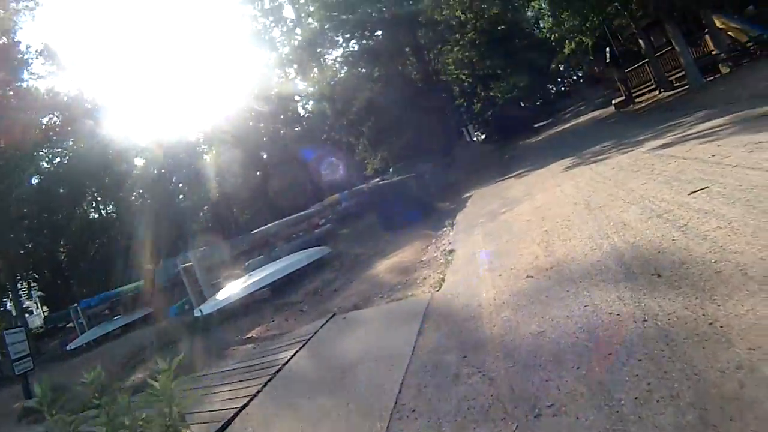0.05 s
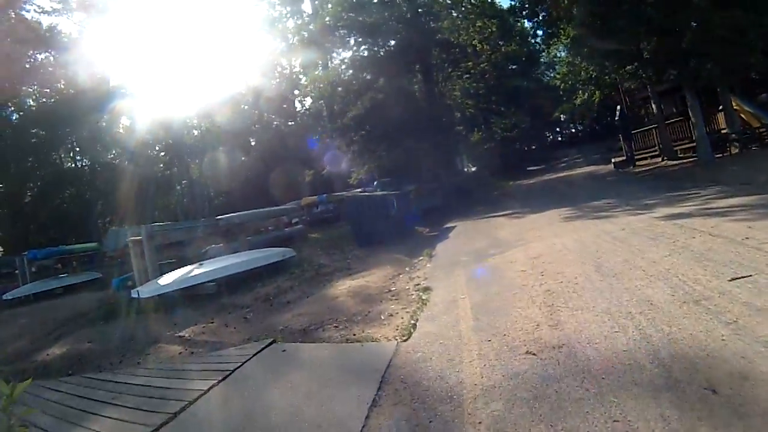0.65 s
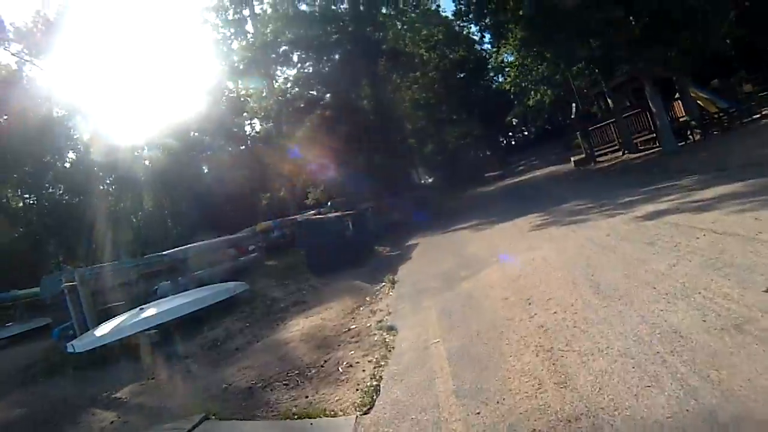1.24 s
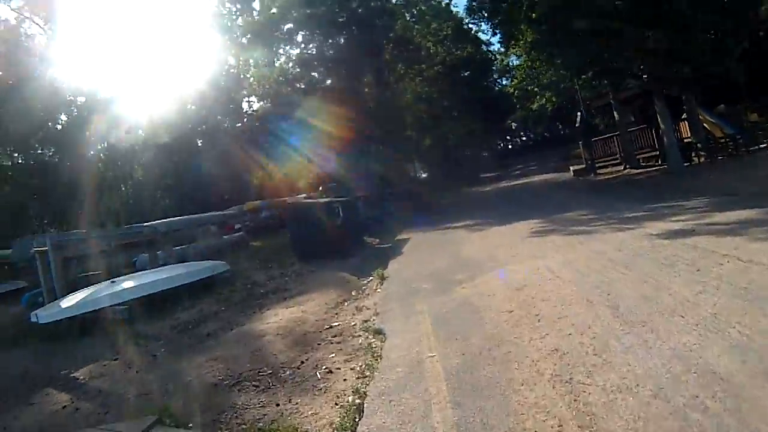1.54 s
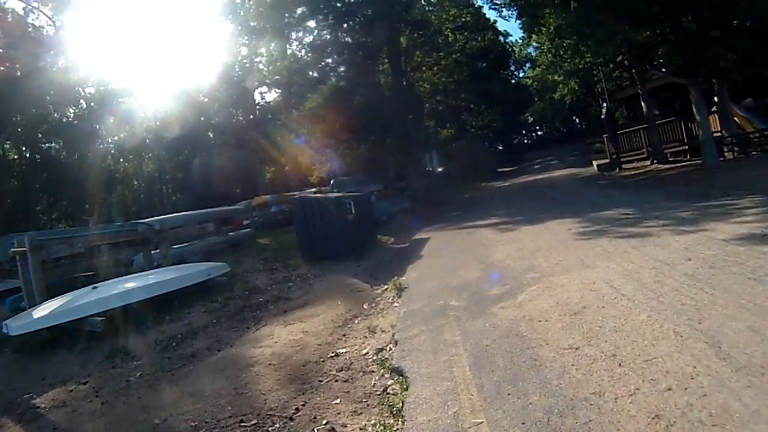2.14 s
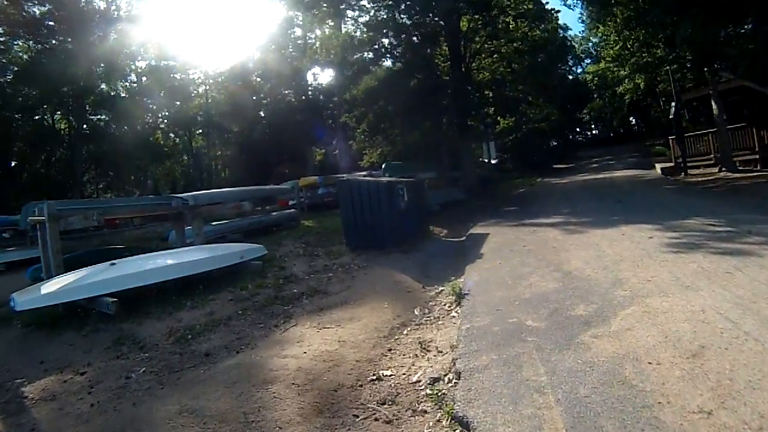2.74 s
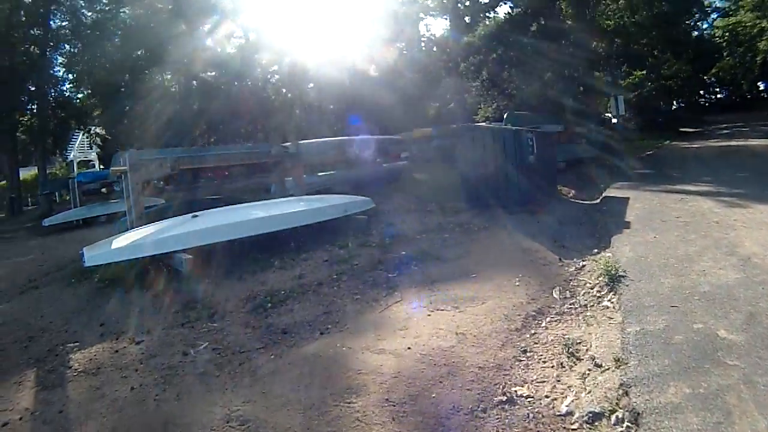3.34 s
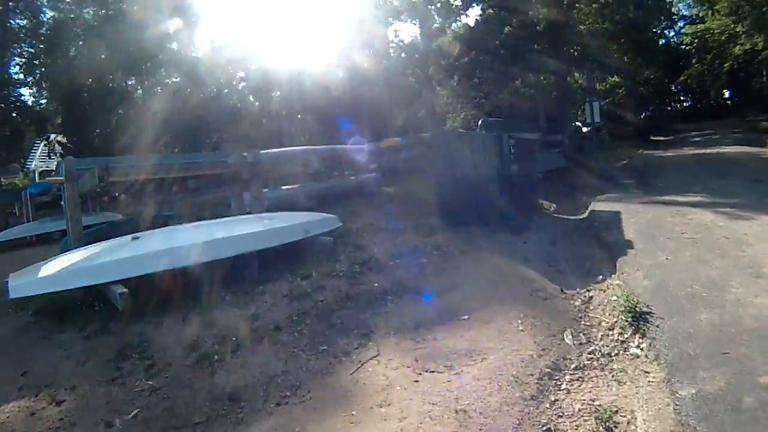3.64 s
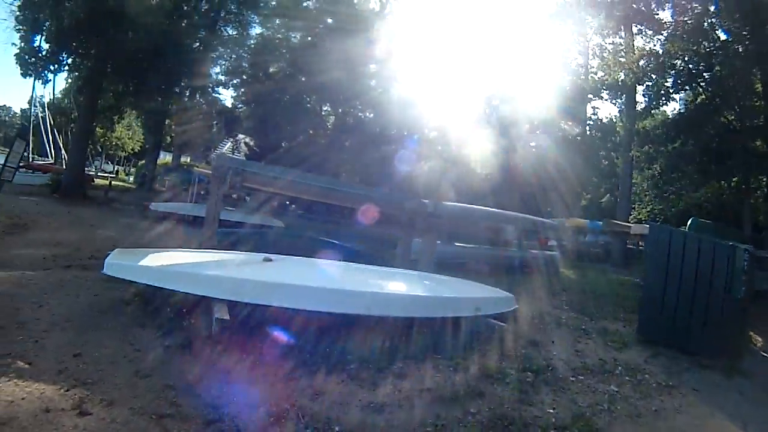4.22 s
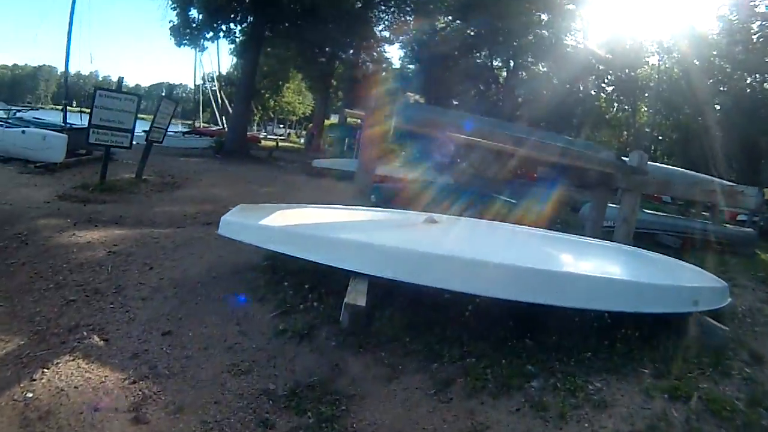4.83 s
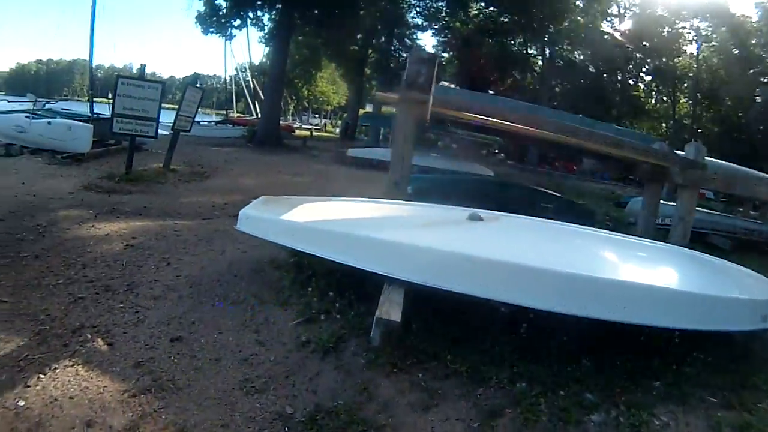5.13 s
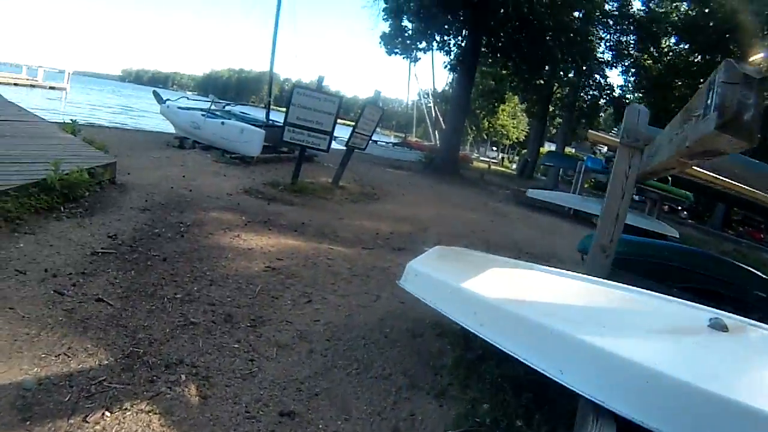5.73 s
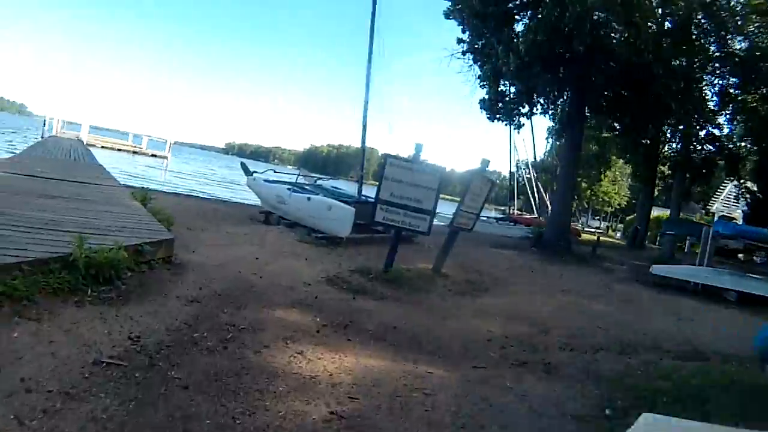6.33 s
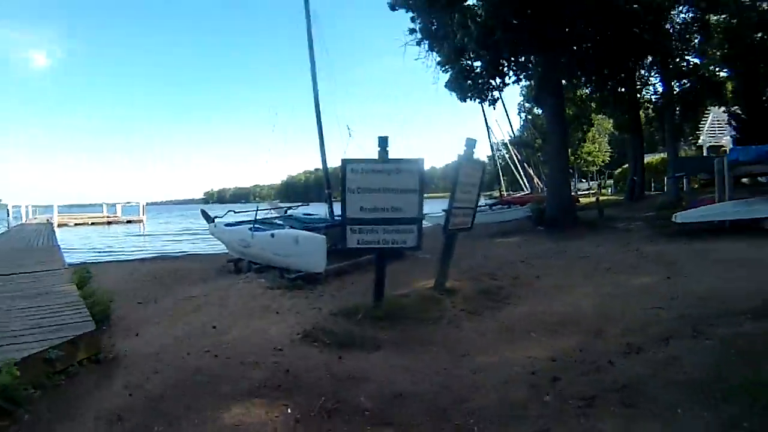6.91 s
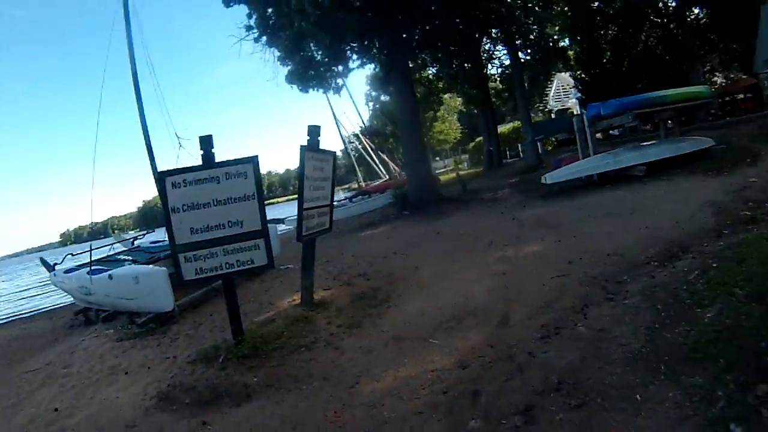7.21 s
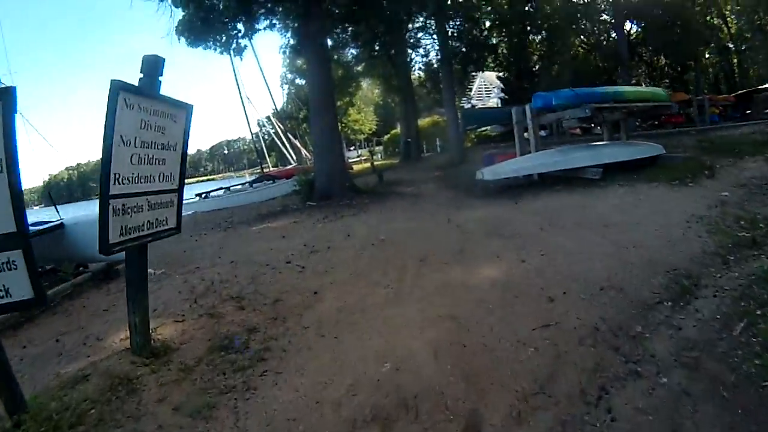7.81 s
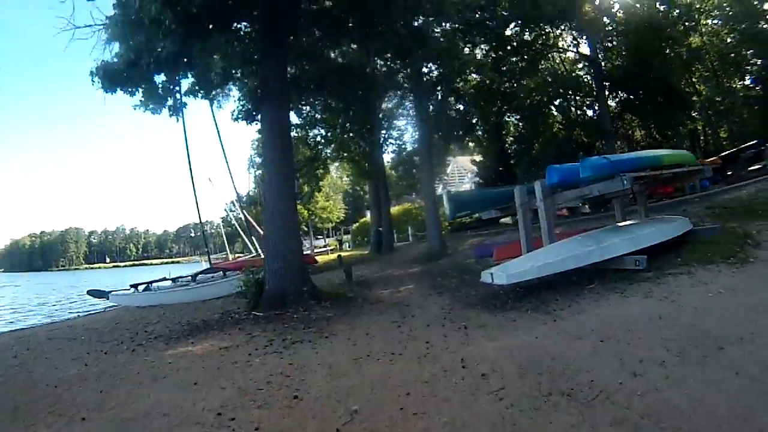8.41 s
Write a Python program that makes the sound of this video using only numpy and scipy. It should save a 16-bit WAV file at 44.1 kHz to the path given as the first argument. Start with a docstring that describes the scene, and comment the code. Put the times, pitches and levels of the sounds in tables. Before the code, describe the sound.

Tyres rumble over dirt and loose sand, picked up almost in mono by a camera mounted on the bicycle, so everything has a boxy ring. Bursts of knocking and rattling come with each rough patch, separated by quieter rolling with gritty chatter and fine hiss. Faint chain chinks, short scuffs and one dry snap dot the ride. The second half adds soft freewheel ticking, brief metallic pings and rasping pebbles before a last run of knocks.

```python
"""A bumpy dirt and sand path, heard through a camera case fixed to a rolling bicycle.
The tyres hum and rumble underneath while grit chatters and sand sizzles. Bumps knock the loose mount;
knocks, scuffs, chatter and the ticking freewheel all ring the same few case resonances.
The chain chinks, something snaps once, pebbles grind, and now and then a small steel part pings."""
import sys
import numpy as np
from scipy import signal
from scipy.fft import rfft, irfft
from scipy.io import wavfile

SR = 44100
rng = np.random.default_rng(int(sys.argv[2]) if len(sys.argv) > 2 else 0)


def dump(signal):
    """Clip the signal to [-1, 1] and save it as 16-bit WAV at the path in sys.argv[1]."""
    limited = np.clip(np.atleast_2d(signal).T, -1, 1)
    pcm = np.round(limited * 32767).astype(np.int16)
    wavfile.write(sys.argv[1], SR, pcm)


N = 373086
TIME = np.arange(N) / SR


def from_db(db):
    """Decibels to gain."""
    return 10 ** (np.asarray(db) / 20)


def rms_one(x):
    """Scale to rms 1."""
    return x / np.sqrt(np.mean(x ** 2) + 1e-20)


def together_db(*gains):
    """Level of unrelated sounds heard at once."""
    return 10 * np.log10(sum(gain ** 2 for gain in gains))


def add(out, s, sound):
    """Mix a sound in from time s on."""
    at = max(int(s * SR), 0)
    out[at:at + len(sound)] += sound[:max(N - at, 0)]


def in_time(rows):
    """Fader curves: each level column at every sample."""
    times, *columns = np.transpose(rows)
    return [np.interp(TIME, times, column) for column in columns]


def swells(rows, attack_s=0.0083, release_s=0.049):
    """Gain envelope: each event rises, holds to the end of its length and dies away."""
    out, t = np.zeros(N), np.arange(SR) / SR
    for s, length, level_db in rows:
        release = np.exp(-np.maximum(t - length, 0) / release_s)
        add(out, s, from_db(level_db) * np.minimum(t / attack_s, 1) * release)
    return out


def drift(per_s):
    """Random modulation of rms 1, gliding through per_s values a second."""
    knots = rng.standard_normal(4000)
    return rms_one(np.interp(TIME * per_s, np.arange(len(knots)), knots))


def noise(spectrum):
    """Noise with the given colour, rms 1."""
    hz, level_db = np.transpose(spectrum)
    bins = np.maximum(np.fft.rfftfreq(N, 1 / SR), 1)
    colour = from_db(np.interp(np.log(bins), np.log(hz), level_db))
    return rms_one(irfft(rfft(rng.standard_normal(N)) * colour, N))


def grains(per_s, spread_db, size):
    """Random tiny contacts, most weak and a few strong."""
    sizes = from_db(spread_db * np.minimum(rng.exponential(1, size), 4)) * rng.choice([-1, 1], size)
    return sizes * (rng.random(size) < per_s / SR)


def slips(per_s, jitter, size):
    """A train of contacts of uneven strength; jitter loosens the rhythm."""
    gaps = np.exp(jitter * rng.standard_normal(size)) * SR / per_s
    at = np.cumsum(gaps).astype(int)
    force = np.zeros(size)
    force[at[at < size]] = rng.rayleigh(1, np.sum(at < size))
    return force


def resonate(force, modes, spread_db=0, detune=0, in_step=False):
    """A force rings parallel resonances; where it lands varies their strength and pitch."""
    out = 0
    for k, (hz, width, level_db) in enumerate(modes):
        strength, pitch = rng.standard_normal(2)
        radius = np.exp(-np.pi * width / SR)
        angle = 2 * np.pi * (hz + detune * width * pitch) / SR
        polarity = 1 if in_step else (-1) ** k
        gain = polarity * from_db(level_db + spread_db * strength) * (1 - radius ** 2) * np.sin(angle)
        poles = [1, -2 * radius * np.cos(angle), radius ** 2]
        out = out + gain * signal.lfilter([1], poles, force + 1e-18)
    # a stiff part passes little below its lowest resonance, least when all ring in step
    low_cut_hz = modes[0][0] * (.85 if in_step else .5)
    return signal.sosfilt(signal.butter(2, low_cut_hz, "high", fs=SR, output="sos"), out)


def wander(force, modes, shift_db=3.5):
    """Each resonance takes up a changing share of the force as the contact points shift."""
    return sum((-1) ** k * resonate(force * from_db(shift_db * drift(70)), [mode])
               for k, mode in enumerate(modes))


# the rolling bed, as speed and surface change: (time [s], hum [dB], chatter [dB])
ROLLING = [(0.0, -40, -36), (.27, -45, -58.5), (.5, -45.5, -47.5), (1.8, -41, -46), (2.05, -46.5, -48.5),
           (2.88, -45.5, -53), (3.6, -36, -43), (4.22, -43, -56.5), (4.48, -41.5, -45.5),
           (5.25, -36, -43.5), (5.5, -40.5, -56), (5.75, -37, -52), (6.6, -39.5, -46.5), (8.46, -33, -41)]
# rough patches shake the whole bicycle: (time [s], length [s], level [dB])
JOLTS = [(0.0, 0.092, -33.5), (.297, 0.14, -27), (1.4, 0.082, -26.5), (3.73, 0.16, -24),
         (3.94, 0.099, -21.5), (4.95, 0.13, -29.5), (5.105, 0.076, -27.5), (7.24, 0.14, -33),
         (7.69, 0.17, -27.5), (8.17, 0.15, -29), (8.41, 0.065, -26)]
# the tyres swish through loose sand: (time [s], length [s], level [dB])
SWISHES = [(.63, 0.014, -33.5), (1.14, 0.1, -44), (1.57, 0.21, -41), (2.13, 0.15, -43), (2.55, 0.025, -34),
           (2.95, 0.096, -42.5), (3.35, 0.15, -40.5), (5.71, 0.32, -42.5), (6.185, 0.036, -33),
           (6.31, 0.11, -42.5), (6.77, 0.084, -33.5), (8.09, 0.28, -37)]


def ride():
    """Hum and chatter levels: steady rolling, jolts that mostly drum and sand that mostly hisses."""
    hum_db, chatter_db = in_time(ROLLING)
    jolt = swells(JOLTS, attack_s=0.008, release_s=0.031)
    swish = swells(SWISHES)
    return (together_db(from_db(hum_db), jolt, swish * from_db(-1.5)),
            together_db(from_db(chatter_db), jolt * from_db(-4.5), swish))


# how hard the ground shakes the frame: (time [s], level [dB])
FRAME_SHAKE = [(0.0, -41), (0.88, -44), (1.62, -41.5), (3.39, -48), (3.79, -33.5), (4.21, -45),
               (5.6, -29.5), (6.14, -42.5), (7.2, -40), (7.39, -35.5), (8.46, -35.5)]
# colour of the frame's rumble: (frequency [Hz], spectral level [dB])
RUMBLE_COLOUR = [(15, -17.5), (36, 3), (55, -3.5), (90, -6), (135, -9), (220, -16), (1000, -79)]
# colour of the tread's hum: (frequency [Hz], spectral level [dB])
HUM_COLOUR = [(70, -22), (140, -0.5), (260, 0), (370, 0), (490, -11.5), (680, -6.5), (950, -15),
              (1150, -18), (16000, -99)]


def tyres(rumble_db, hum_db, rumble_trim_db=2.5, hum_trim_db=-4.0, lumpy_db=6.0):
    """Uneven ground shakes the frame; the tread hums through it."""
    rumble = from_db(rumble_db + rumble_trim_db) * noise(RUMBLE_COLOUR)
    hum = from_db(hum_db + hum_trim_db + lumpy_db * drift(25)) * noise(HUM_COLOUR)
    return rumble + hum


# low body resonances of mount and case: (frequency [Hz], width [Hz], level [dB])
THUD = [(144.5, 52, -4.5), (267.7, 49, 2.5), (378, 68, -7.5), (579, 102, -4), (738, 101, -7.5)]
# their hollow midrange: (frequency [Hz], width [Hz], level [dB])
CLACK = [(938, 162, 6.5), (1320, 150, 3.87), (1512, 158, 3.4)]
# their crisp top: (frequency [Hz], width [Hz], level [dB])
TICK = [(2060, 296, 0), (2550, 183, 1), (2798, 220, -4.5), (3800, 527, -11), (4720, 320, -17.5),
        (8070, 840, -21.5), (9650, 474, -11), (10050, 1470, -21), (14380, 410, -13.5)]


def chatter(hum_db, chatter_db):
    """Grit and single stones keep the case ticking; its lows follow the tyre hum."""
    stones = rms_one(slips(per_s=28, jitter=.6, size=N))
    grit = rms_one(grains(per_s=2200, spread_db=3.0, size=N))
    force = rms_one(grit + 0.67 * stones)
    bands = (THUD, hum_db - 5.5), (CLACK, (hum_db + chatter_db) / 2 - 2.5), (TICK, chatter_db + 1)
    return sum(from_db(level_db) * rms_one(wander(force, modes)) for modes, level_db in bands)


def walls(x, decay_s=.005, above_hz=5000, wet=.3):
    """The thin case walls add a crowd of faint, close resonances to the treble."""
    t = np.arange(SR // 30) / SR
    tail = rng.standard_normal(len(t)) * np.exp(-t / decay_s)
    low_cut = signal.butter(2, above_hz, "high", fs=SR, output="sos")
    tail = signal.sosfilt(low_cut, tail / np.linalg.norm(tail))
    return x + wet * signal.fftconvolve(x, tail)[:N]


# fine sand sprays against the frame: (time [s], length [s], level [dB])
SPRAYS = [(3.36, .12, -57), (5.52, .22, -63.5)]
# where sand grains ring: (frequency [Hz], width [Hz], level [dB])
SAND_MODES = [(6050, 3100, -12), (10930, 630, 5.5), (13100, 1000, -3)]


def sizzle(chatter_db, sand_db=-17.0):
    """Sand sizzles high above the chatter, and more where the tyre throws it up."""
    gain = from_db(chatter_db + sand_db) + swells(SPRAYS)
    sand = grains(per_s=4000, spread_db=3.5, size=N)
    return gain * rms_one(wander(sand, SAND_MODES))


# the loose mount knocks; harder hits tick more and thud less: (time [s], strength [dB], hardness [dB])
KNOCKS = [(.051, -19.5, 1), (.308, -10, 0), (.314, -17.5, -1), (0.323, -14, 7), (0.338, -15, -7),
          (.344, -14, 4), (.382, -11, 1), (.402, -22, 7), (.418, -12, -2), (.508, -29, -3.5),
          (.846, -37, 8), (.955, -38.5, -12.5), (1.218, -29, -0.5), (1.256, -32, -5), (1.291, -21, -2.5),
          (1.344, -29.5, -3), (1.398, -19, -1.5), (1.437, -20.5, -4.5), (1.442, -18, 2), (1.468, -13.5, -2),
          (1.514, -25.5, -2), (1.54, -24, -2.5), (1.597, -33, -9.5), (1.631, -26.5, -0.5),
          (2.456, -16.5, 4.5), (2.54, -18, -2), (2.568, -33.5, 0), (2.9, -34, -5.5), (3.204, -30, -3),
          (3.279, -26.5, -4), (3.559, -29.5, -5.5), (3.693, -26, -2), (3.732, -13, -5.5), (3.754, -9, 4),
          (3.782, -13.5, -1), (3.814, -18.5, 3), (3.838, -23, 1), (3.879, -24, 7), (3.897, -25.5, 10),
          (3.961, -13.5, 0), (3.995, -10.5, 6), (4.028, -17, 3.5), (4.052, -17.5, 4), (4.099, -23.5, -2.5),
          (4.27, -26.5, -1), (4.32, -29.5, -5.5), (4.953, -10.5, -0.5), (5.013, -31, 3), (5.032, -21, -1),
          (5.139, -18, -8.5), (5.155, -9.5, 0), (5.168, -16.5, 0), (5.201, -17, -5), (5.208, -8.5, 8),
          (5.817, -25.5, 1), (5.83, -22.5, -1.5), (5.85, -22.5, 0.5), (5.898, -32.5, 1), (5.965, -26, -2.5),
          (6.187, -31, 16.5), (7.243, -26, 0), (7.267, -18.5, 5.5), (7.276, -21.5, -6.5),
          (7.308, -20.5, -2), (7.317, -25.5, -3), (7.394, -26, 0), (7.434, -23, 0), (7.66, -26, -3),
          (7.712, -17, 0), (7.74, -28, 3), (7.766, -22, 1.5), (7.795, -14, -0.5), (7.819, -17.5, -1.5),
          (7.837, -35, -2), (7.849, -13, 0.5), (7.878, -17.5, 3), (7.904, -31, 6), (7.938, -20.5, -2.5),
          (7.954, -25.5, 2.5), (8.103, -22, -2), (8.197, -19.5, 2.5), (8.249, -13.5, -1), (8.416, -18, -3),
          (8.45, -15.5, 0.5)]


def knocks(graze_s=0.0003, bounce=.14, bounce_s=0.0015, shiver=0.014, shiver_s=0.0095):
    """A graze, one hard contact with micro-bounces, then a faint shiver of the mount."""
    out, t = np.zeros(N), np.arange(-SR // 200, SR // 10) / SR
    graze = bounce * np.exp(-abs(t) / graze_s)
    settle = bounce * np.exp(-abs(t) / bounce_s) + shiver * np.exp(-abs(t) / shiver_s)
    pressure = np.where(t < 0, graze, settle)
    for s, strength_db, hardness_db in KNOCKS:
        force = rms_one(grains(per_s=7000, spread_db=0.5, size=len(t))) * pressure - (t == 0)
        levels_db = strength_db - hardness_db - 3, strength_db - 3, strength_db + hardness_db - 4
        for modes, level_db in zip((THUD, CLACK, TICK), levels_db):
            # the blow shoves the whole mount at once, so the lower resonances start in step
            ring = resonate(force, modes, spread_db=4.0, detune=0.44, in_step=modes is not TICK)
            attack_rms = np.std(ring[t >= 0][:SR // 100])
            add(out, s + t[0], from_db(level_db) * ring / attack_rms)
    return out


# faint chinks of the chain: (time [s])
CHINKS = [0.777, 1.142, 1.977, 5.464, 7.611]
# resonances of a chain link: (frequency [Hz], width [Hz], level [dB])
LINK_MODES = [(4740, 210, -25), (7180, 140, -26)]


def chain(decay_s=0.0066):
    """A brief contact rings a chain link, thin and high."""
    out, t = np.zeros(N), np.arange(SR // 5) / SR
    for s in CHINKS:
        add(out, s, resonate(rng.standard_normal(len(t)) * np.exp(-t / decay_s), LINK_MODES))
    return out


# the fittings creak and scuff: (time [s], length [s], thud [dB], clack [dB], tick [dB])
SCUFFS = [(1.814, 0.02, -34, -32.5, -39), (2.125, 0.02, -36, -54, -54), (3.361, 0.032, -31, -34, -59),
          (3.439, 0.043, -24.5, -28.5, -34), (4.631, 0.028, -31, -33, -37.5),
          (4.864, 0.035, -29.5, -39, -41), (4.955, 0.015, -25.5, -26, -19), (5.703, 0.037, -27, -34, -36)]


def scuffs(lean=0.64, sand=0.43, trim_db=0.5):
    """Short stick-slip rubs with some sand in them, rising faster than they fall."""
    out, t = np.zeros(N), np.arange(SR // 5) / SR
    # a rub is too light to rock the whole mount, so its lowest resonances stay quiet
    bands = THUD[3:], CLACK, TICK
    for s, length, *levels_db in SCUFFS:
        rub = rms_one(slips(per_s=380, jitter=.07, size=len(t))) + sand * rng.standard_normal(len(t))
        force = rub * np.sin(np.pi * np.minimum(t / length, 1) ** lean)
        for modes, level_db in zip(bands, levels_db):
            ring = resonate(force, modes, spread_db=-0.5, detune=0.21)
            rub_rms = np.sqrt(np.sum(ring ** 2) / (length * SR))
            add(out, s, from_db(level_db + trim_db) * ring / rub_rms)
    return out


# resonances of a dry snap, perhaps a twig: (frequency [Hz], width [Hz], level [dB])
SNAP_MODES = [(754, 780, 0), (1470, 290, 3.5), (4470, 1100, -26), (10700, 550, -17), (13400, 810, -23)]


def snap(at_s=2.269, peak_db=-0.5, splinter=0.061, splinter_s=0.0021):
    """One sharp break with a brief splintering after it."""
    out, t = np.zeros(N), np.arange(SR // 20) / SR
    force = (t == 0) + splinter * rng.standard_normal(len(t)) * np.exp(-t / splinter_s)
    crack = resonate(force, SNAP_MODES)
    add(out, at_s, from_db(peak_db) * crack / np.max(abs(crack)))
    return out


# pebbles grind together under the tyre: (time [s], length [s], centre pitch [Hz], level [dB])
GRINDS = [(4.085, 0.023, 2032, -26), (5.71, 0.012, 2064, -25), (5.815, 0.012, 2130, -24),
          (6.777, 0.027, 1755, -24), (6.814, 0.012, 2010, -21), (8.184, 0.06, 1872, -26),
          (8.302, 0.043, 2090, -26.5)]


def grinds(sag_octaves=0.354, roughness_hz=330):
    """Each pebble rasps at one rough pitch, which sags as it slips."""
    out, t = np.zeros(N), np.arange(SR // 10) / SR
    smooth = signal.butter(2, roughness_hz, fs=SR, output="sos")
    for s, length, hz, level_db in GRINDS:
        progress = np.minimum(t / length, 1)
        phase = 2 * np.pi * np.cumsum(hz * 2 ** (sag_octaves * (.5 - progress))) / SR
        rough = signal.sosfilt(smooth, rng.standard_normal((2, len(t))))
        envelope = np.sin(np.pi * np.sqrt(progress))
        rasp = (rough[0] * np.cos(phase) + rough[1] * np.sin(phase)) * envelope
        add(out, s, from_db(level_db) * rasp / np.std(rasp[t < length]))
    return out


def freewheel(start_s=4.4, end_s=7.2, level_db=-54):
    """While the rider coasts, pawls drop almost evenly, some much harder, and ring the case."""
    drops = slips(per_s=65, jitter=.1, size=N) ** 2
    coasting = (TIME > start_s) & (TIME < end_s)
    ticks = np.gradient(resonate(drops, TICK))   # metal on metal is bright
    return from_db(level_db) * coasting * rms_one(ticks)


# taps on a small steel part, sometimes free, sometimes held: (time [s], level [dB], 60 dB decay [s])
PINGS = [(4.525, -5.5, 0.064), (4.758, -6.5, 0.013), (6.016, -4, 0.027), (6.456, -12, 0.042),
         (8.273, -11, 0.041)]
# the steel's partials: (frequency [Hz], level [dB])
STEEL_PARTIALS = [(2940, -5), (9085, -14), (14915, -17)]


def pings(clink=0.44, clink_s=0.0054):
    """A hard clink through the case, then steel rings briefly."""
    out, t = np.zeros(N), np.arange(SR // 5) / SR
    tone = sum(from_db(db) * np.sin(2 * np.pi * hz * t) for hz, db in STEEL_PARTIALS)
    for s, level_db, t60 in PINGS:
        contact = resonate(rng.standard_normal(len(t)) * np.exp(-t / clink_s), TICK)
        contact = np.diff(contact, prepend=0)   # brightens the attack
        ring = from_db(-60 * t / t60) * tone
        add(out, s, from_db(level_db) * (ring + clink * contact / np.max(abs(contact))))
    return out


def scene(side_rumble_db=-39.5, side_treble_db=-31.5):
    """Sound arrives through the mount, almost mono; a little rumble and treble give it width."""
    hum_db, chatter_db = ride()
    rumble_db, = in_time(FRAME_SHAKE)
    mount = walls(knocks() + scuffs() + chatter(hum_db, chatter_db) + freewheel())
    bike = mount + sizzle(chatter_db) + pings() + chain() + grinds() + snap() + tyres(rumble_db, hum_db)
    side = from_db(rumble_db + side_rumble_db) * noise(RUMBLE_COLOUR)
    side += from_db(side_treble_db) * np.gradient(bike)
    return np.array([bike + side, bike - side])


def record(dry):
    """The hardest knocks overload, and the top is cut at 16 kHz."""
    high_cut = signal.ellip(10, .1, 70, 16000, fs=SR, output="sos")
    return signal.sosfilt(high_cut, np.clip(dry, -1, 1))


dry = scene()
out = record(dry)
dump(out)
```